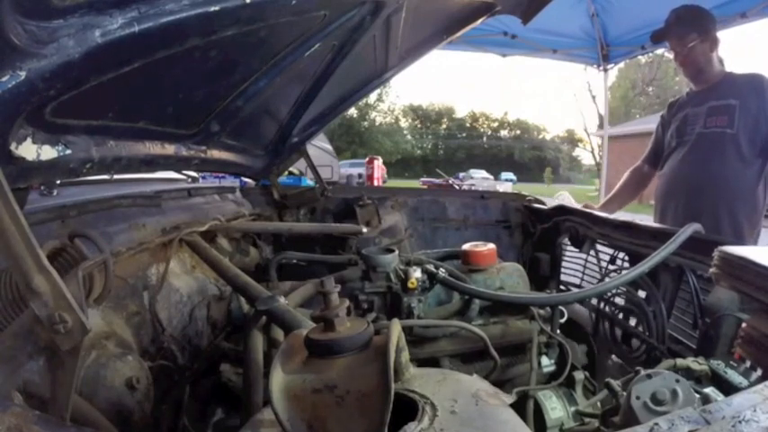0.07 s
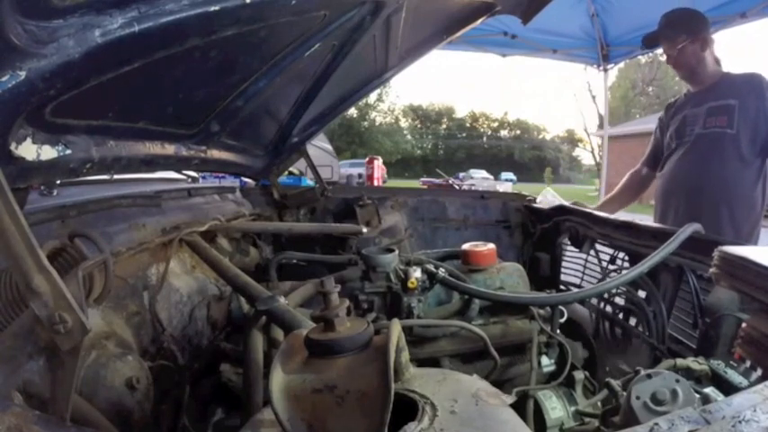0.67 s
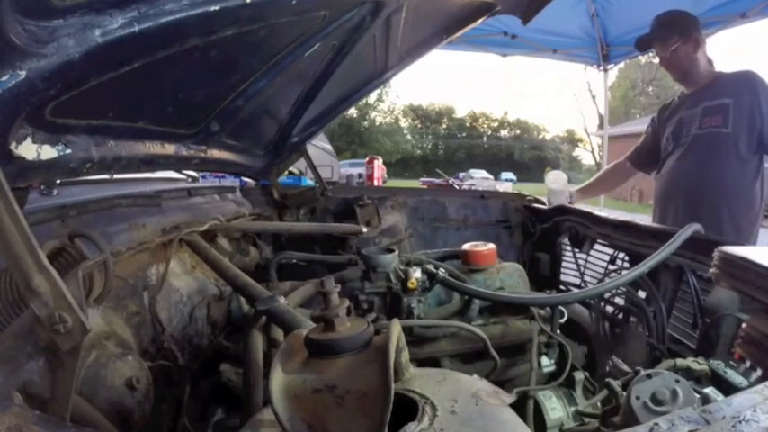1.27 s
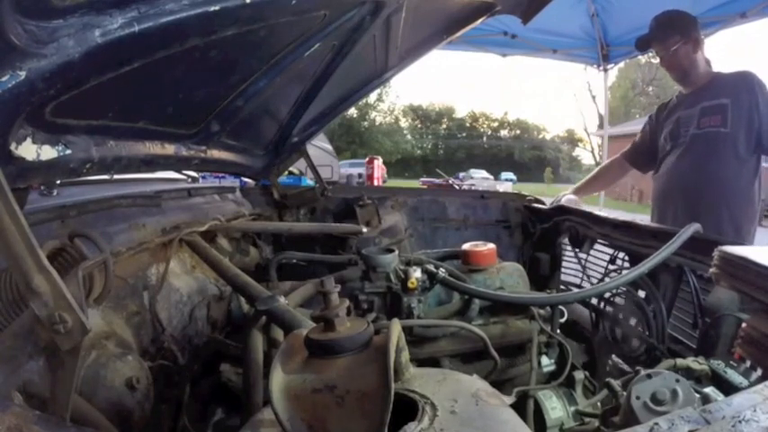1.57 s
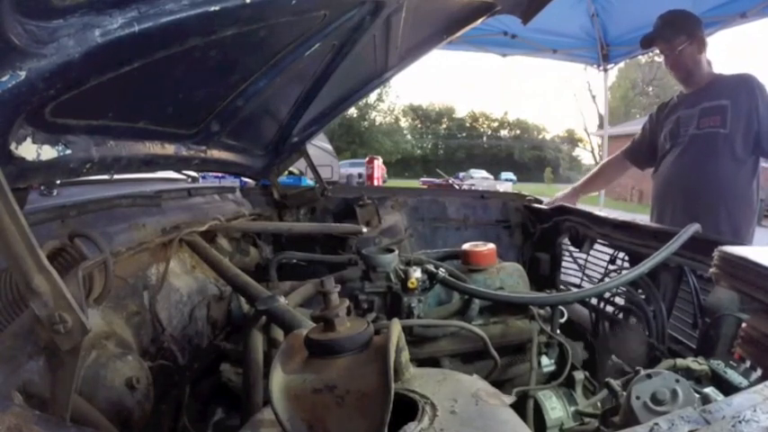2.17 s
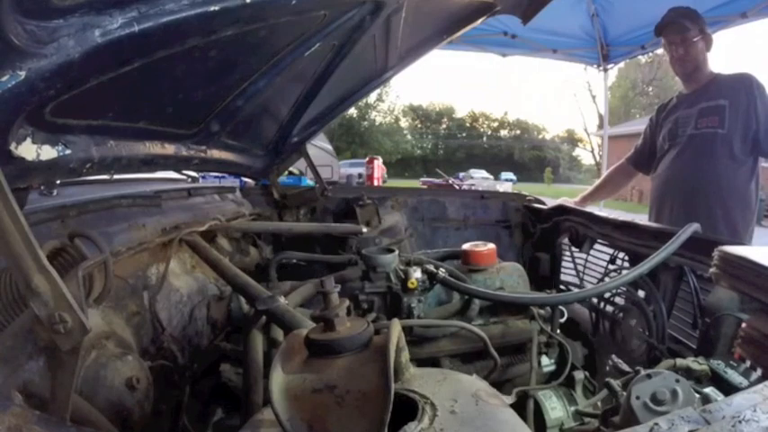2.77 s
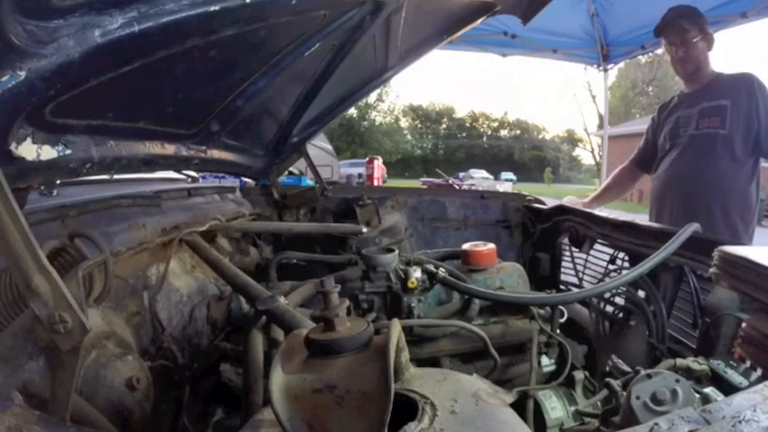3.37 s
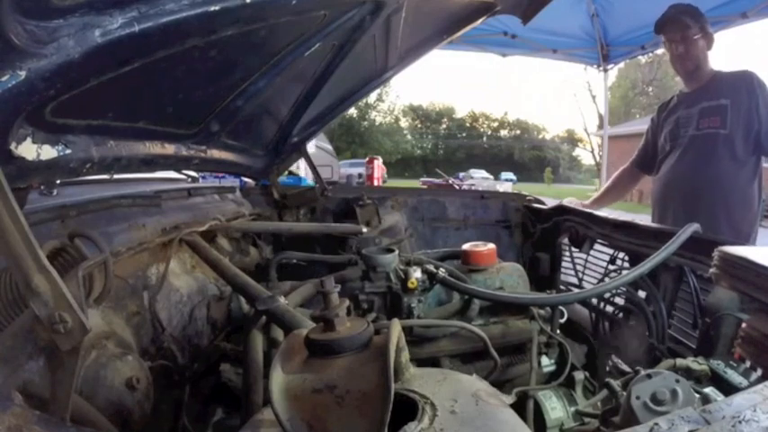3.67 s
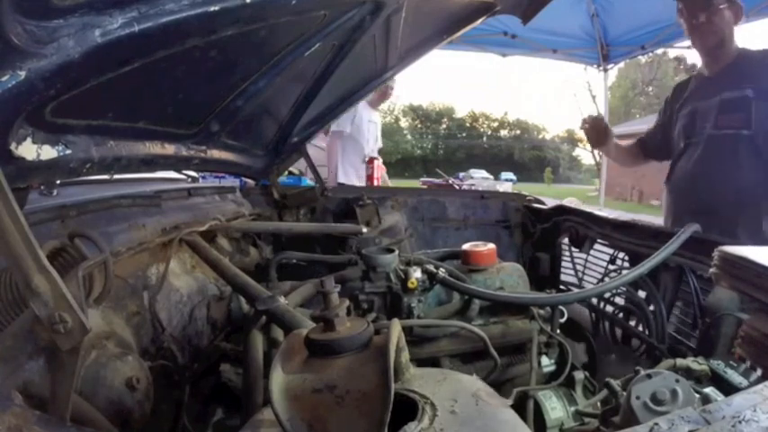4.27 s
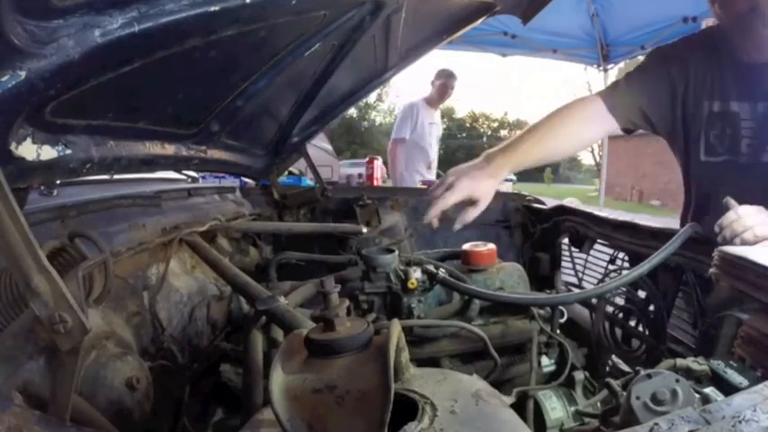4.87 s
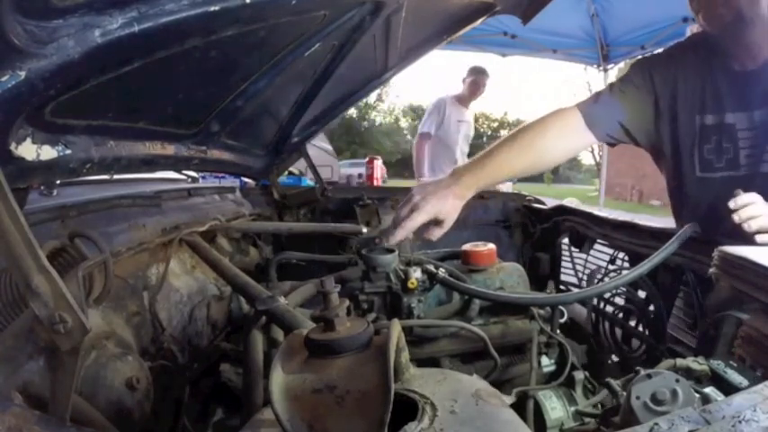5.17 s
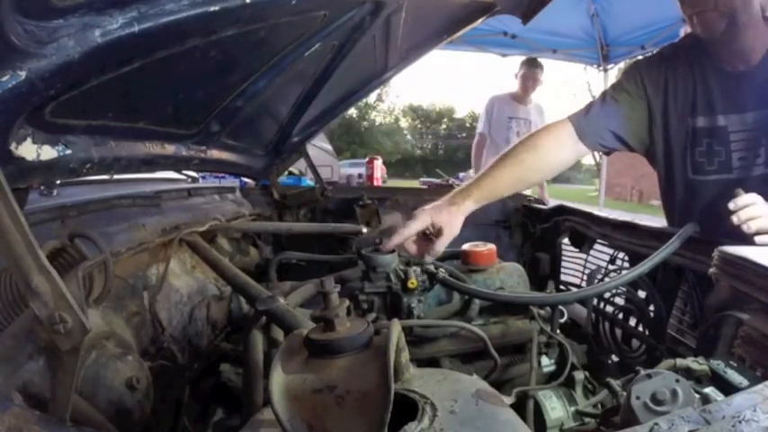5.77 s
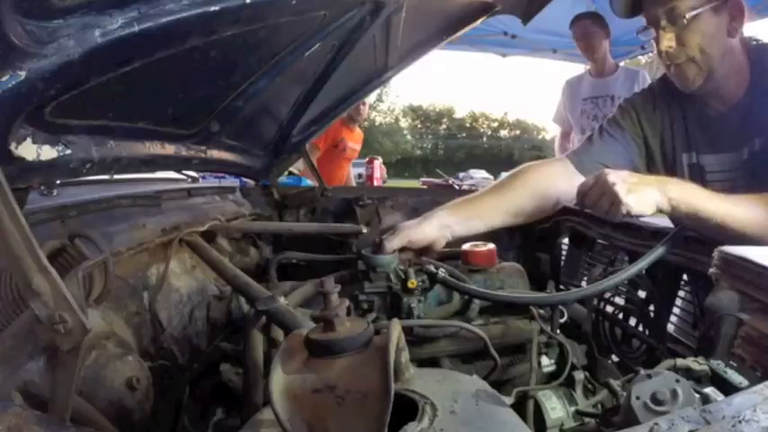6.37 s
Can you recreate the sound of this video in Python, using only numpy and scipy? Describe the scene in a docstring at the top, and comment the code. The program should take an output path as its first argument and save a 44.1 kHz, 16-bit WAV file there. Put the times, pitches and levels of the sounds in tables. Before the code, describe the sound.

With the microphone close in the engine bay, a worn engine chugs and rattles while its carburetor spits now and then. After about five seconds it starves and slows, leaving light ticks, a faint whine and some last chugs. It cuts off abruptly. A hard metallic knock follows with a short room echo, then a faint low rumble.

```python
"""An old engine runs unevenly on fuel poured into the carburetor, the microphone under its open hood.
Each firing chugs in the exhaust, worn parts clatter with every turn of the crank, the belt rubs and
the carburetor spits. Near 4.9 s the fuel runs out: the clatter stops and the engine falters, valves
ticking. The sound breaks off at 5.8 s; a hard knock on metal rings in a room, overloading the
recorder, and a faint rumble comes in at the end."""
import sys
import numpy as np
from scipy import signal
from scipy.fft import rfft, irfft
from scipy.io import wavfile
from scipy.ndimage import uniform_filter1d, map_coordinates

SR = 44100
rng = np.random.default_rng(int(sys.argv[2]) if len(sys.argv) > 2 else 0)


def materialize(psi):
    """Save the field psi as 16-bit PCM at rate SR to the path in sys.argv[1].

    A 1-D psi becomes a single channel; in a 2-D psi each row is a channel.
    """
    bounded = np.clip(np.atleast_2d(psi).T, -1, 1)
    quanta = np.round(bounded * 32767).astype(np.int16)
    wavfile.write(sys.argv[1], SR, quanta)


N = 287091
T = np.arange(N) / SR
HZ = np.fft.rfftfreq(16384, 1 / SR)
STARVED_S, SLOWING_S = 4.9, 5.137  # the fuel runs out; friction starts to brake the crank
BREAK_S, KNOCK_S = 5.812, 6.0285
VALVE_PLACE, VALVES_PER_TURN = .327, 3  # a "place" is a position in the crank's turn, 0-1

# crankshaft speed before braking, sagging slowly: t/s, speed/(turns/s)
CRANK_SPEED = [(0, 11.11), (.8, 10.95), (1.6, 10.91), (2.4, 10.84), (2.8, 10.76), (4, 10.64), (4.4, 10.63),
               (4.85, 10.5)]
# broad colour of the engine bay: f/Hz, relative level/dB
BAY_COLOUR = [(30, -23), (250, -6.5), (550, -15), (1000, -8), (1800, -10.5), (2400, -7.5), (4300, -14.5),
              (6200, -15.5), (7200, -25), (10500, -35.5), (12000, -41.5), (15000, -47.5)]
# resonances of block and panels: f/Hz, width/Hz, boost/dB, place that jars it/turns
BAY_MODES = [(1000, 99, 3.6, 0.518), (1122, 160, 3.8, .4), (1236, 24, 0.57, 0.497), (1332, 42, 3.4, .55),
             (1483, 175, 8.7, .47), (1678, 51, 2, .4), (1903, 115, 2.34, .2), (2203, 200, 9.6, .12),
             (2456, 110, 6.8, 0.44), (2705, 76, 1.8, .1), (2904, 190, 7.8, .08), (3157, 220, 7.3, .2),
             (3430, 71, 4.6, 0.42), (3613, 304, 10.4, .06), (4053, 203, 11.6, 0.55), (4269, 132, 12.1, .55),
             (4450, 160, 5.5, .4), (4663, 126, 8.9, .62), (5024, 310, 5, 0.6), (5130, 75, 4.3, 0.63),
             (5600, 160, 3.6, 0.34), (6074, 150, 7.7, 0.75), (6830, 230, 4.3, 0.041), (7480, 200, 4, 0.034),
             (9100, 310, 5, 0.036), (10750, 260, 4, .4)]


def amp(db):
    """Decibels to gain."""
    return 10 ** (np.asarray(db) / 20)


def unit(x):
    """Scales to rms 1."""
    return x / np.sqrt(np.mean(x ** 2) + 1e-20)


def curve(rows, column=1):
    """One column of a time table at every sample."""
    rows = np.array(rows)
    return np.interp(T, rows[:, 0], rows[:, column])


def spectrum(points, hz):
    """Interpolates a table on a log-frequency axis."""
    f, value = np.transpose(points)
    return np.interp(np.log(hz + 1), np.log(f + 1), value)


def bell(x, width):
    """A bell curve of height 1."""
    return np.exp(-.5 * (x / width) ** 2)


def ramp(start, end):
    """Rises from 0 to 1 between two times."""
    return np.clip((T - start) / max(end - start, 1e-4), 0, 1)


def surge(s, rise, decay):
    """Swells to 1 at time s and dies away."""
    return np.where(T < s, bell(T - s, rise), np.exp(-abs(T - s) / decay))


def body(points, modes=()):
    """Gain from a broad colour (f/Hz, level/dB) and its resonances (f/Hz, width/Hz, boost/dB)."""
    peaks_db = sum(db * np.exp(-(2 * (HZ - f) / width) ** 2) for f, width, db, *_ in modes)
    return amp(spectrum(points, HZ) + peaks_db)


def band(centre_hz, octaves):
    """Gain of a soft band around a centre."""
    return bell(np.log2((HZ + 1) / centre_hz), octaves)


def colour(x, gain):
    """Minimum-phase filter shaped like this gain; white noise keeps its power."""
    cepstrum = irfft(np.log(np.maximum(unit(gain), 1e-5)))
    cepstrum[1:len(gain) - 1] *= 2
    cepstrum[len(gain):] = 0
    impulse = irfft(np.exp(rfft(cepstrum)))[:len(gain)]
    return signal.oaconvolve(x, impulse)[:N]


def noise():
    """White noise of power 1."""
    return rng.standard_normal(N)


def wobble(rate_hz, octaves):
    """Random motion around a rate, rms about 1."""
    return colour(noise(), band(rate_hz, octaves))


def flicker(depth_db, samples):
    """A fast random gain of rms 1."""
    return unit(amp(depth_db * unit(uniform_filter1d(noise(), size=samples))))


def add(mix, s, sound):
    """Mixes a sound in at time s."""
    at = round(s * SR)
    sound = sound[max(-at, 0):]
    part = mix[max(at, 0):][:len(sound)]
    part += sound[:len(part)]


def crank(braking=6.284):
    """Turns of the crankshaft so far: nearly steady, then braked by friction (turns/s^2)."""
    speed = curve(CRANK_SPEED) - braking * np.maximum(T - SLOWING_S, 0)
    return np.cumsum(speed) / SR - .022


def passes(place, start, end, count=1):
    """Times at which the crank passes a place in its turn, or count evenly spaced places."""
    times = T[1:][np.diff(np.floor((crank() - place) * count)) > 0]
    return times[(times > start) & (times < end)]


def each_turn(place, rise, decay, uneven_db, play=0):
    """One swell per crank turn, each of its own strength; rise, decay and play are in turns."""
    turns = crank() - place + .3  # each cycle opens 0.3 turn ahead of its peak
    from_peak = (turns + play) % 1 - .3
    force = amp(uneven_db * rng.standard_normal(100))[np.floor(turns).astype(int) + 1]
    return force * bell(from_peak, np.where(from_peak < 0, rise, decay))


def through_bay(x, bay, hz, octaves):
    """Sounds one band of the engine bay, louder where the bay responds more."""
    gain = bay * band(hz, octaves)
    return colour(x, gain) * np.sqrt(2 * np.sum(gain ** 2) / np.sum(bay ** 2))


def backgrounds(hush_db=-59, rumble_db=-41, rumble_decay_s=.2):
    """Room tone around the knock, and a low rumble that starts at the end."""
    # spectra of the room tone and the rumble: f/Hz, relative level/dB
    hush_colour = [(18, -74.5), (30, -34), (161, 0.5), (350, -11.5), (428, -19), (473, -9.5), (510, -17.5),
                   (2730, -30), (4190, -29), (12000, -51), (15600, -79), (22000, -120)]
    rumble_colour = [(18, -30), (30, 10.5), (102, -5), (510, -24), (593, -20), (689, -42), (821, -16),
                     (1080, -28), (1390, -9), (1740, -25.5), (12000, -53), (15600, -77), (22000, -120)]
    hush = amp(hush_db) * colour(noise(), body(hush_colour)) * ramp(5.8, 5.815) * (1 - ramp(6.158, 6.19))
    rumble = amp(rumble_db) * colour(noise(), body(rumble_colour)) * ramp(6.456, 6.459)
    return hush + rumble * np.exp(-abs(T - 6.459) / rumble_decay_s)


def room_tail(level_db=-10.5, rise_s=.013):
    """The room answers the knock with a diffuse tail that lasts longest in the midrange."""
    # colour of the reverberation: f/Hz, relative level/dB
    room_colour = [(47, -92.5), (80, -53.5), (178, -25.5), (293, -14), (348, -18), (547, -9.5), (665, -14),
                   (862, -15), (2280, -29), (2540, -35.5), (3020, -40), (3220, -37), (14000, -74)]
    # its decay: f/Hz, t60/s
    room_t60 = [(150, 0.32), (500, 0.77), (1200, 0.68), (2500, 0.49), (6000, 0.25), (12000, .25)]
    hz, times, frames = signal.stft(colour(noise(), body(room_colour)), SR, nperseg=256)
    decay = amp(-60 * np.maximum(times - KNOCK_S, 0) / spectrum(room_t60, hz)[:, None])
    tail = signal.istft(frames * decay, SR, nperseg=256)[1][:N]
    return amp(level_db) * tail * (1 - np.exp(-np.maximum(T - KNOCK_S, 0) / rise_s))


def knock(crack_db=-6, crack_decay_s=.0094, rebound_db=-27, snap_db=-1, chatter_db=-27):
    """A hard blow on metal in a room: snap, crack, chatter, ring and a light rebound, faded quickly."""
    # ringing tones of the knock, plus a faint, steady high whistle at 6.2 kHz: f/Hz, level/dB, t60/s
    knock_tones = [(545, -5.5, 0.11), (292.6, -21.5, 0.38), (378, -19, 0.31), (470, -21, 0.33),
                   (510, -21, .4), (510, -21.5, .4), (539, -18, .6), (556, -17.5, 0.53), (630, -19, 0.4),
                   (795, -25, .62), (813, -25.5, .55), (837, -24.5, .55), (867, -22, 0.88),
                   (940, -20.5, 0.36), (1152, -21.5, .35), (1414, -24, 2.4), (1602, -9, 0.1),
                   (2080, -29.5, .5), (2240, -23.5, 0.28), (2660, -20, .08), (2910, -21.5, 0.25),
                   (3660, -39, 0.45), (4190, -54, 2.5), (6220, -69, 4.5)]
    t = np.maximum(T - KNOCK_S, 0)
    tones = sum((-1) ** k * amp(db - 60 * t / t60) * np.sin(2 * np.pi * f * t)
                for k, (f, db, t60) in enumerate(knock_tones))
    snap = amp(snap_db) * colour(noise() * (t > 0) * np.exp(-t / .00088), band(1800, .99))
    blow = amp(crack_db) * (t > 0) * np.exp(-t / crack_decay_s)
    rebound = amp(rebound_db) * bell(T - 6.061, .002)
    crack_gain = body([(60, -29), (150, -15), (320, -6.5), (900, .5), (1800, 3), (4000, -15),
                       (8000, -22.5), (15000, -35)])
    crack = colour(noise() * (blow + rebound), crack_gain)
    chatter = amp(chatter_db) * colour(noise() * (t > 0) * bell(t - .009, .0044), band(3500, .91))
    return (tones + snap + crack + chatter + room_tail()) * (1 - ramp(6.158, 6.19))


def gear(final_db=-50, growth_db_per_s=1.5, teeth=40, waver=.012):
    """A faint, wavering gear hum follows the crank and grows until the fuel runs out."""
    drift = np.cumsum(waver * curve(CRANK_SPEED) * wobble(13.5, .97)) / SR
    hum = np.sin(2 * np.pi * teeth * (crank() + drift))
    level = amp(final_db + growth_db_per_s * (T - STARVED_S))
    return level * hum * (1 - ramp(STARVED_S - .04, STARVED_S))


def faltering(whirr_db=-49, octave_db=-11):
    """With the clatter gone, a ringing whirr, a few scrapes and the belt drive's whine are left."""
    # colour of the whirr: f/Hz, relative level/dB
    whirr_colour = [(30, -33), (250, -15), (700, -15.5), (1400, -11.5), (2500, -17), (4200, -27.5),
                    (6500, -33), (9000, -40.5), (15000, -55)]
    # its resonances: f/Hz, width/Hz, boost/dB
    whirr_modes = [(340, 14, 3), (1420, 60, 7.6), (2230, 290, 13), (2950, 208, 9.3), (3620, 210, 9.1),
                   (4740, 320, 6), (6100, 510, 6.3)]
    # short hissing scrapes: t/s, level/dB, width/s
    scrape_events = [(4.876, -47, 0.015), (4.96, -49.5, .025), (5.05, -47.5, 0.017)]
    # the unevenly falling whine: t/s, f/Hz, level/dB
    whine_path = [(5.25, 550, -63), (5.38, 520, -48), (5.47, 485, -41), (5.55, 530, -46), (5.66, 515, -42),
                  (5.78, 475, -45), (5.83, 460, -42)]
    treble_tilt = body([(2400, -4.5), (3400, -4), (9000, -1)])
    whirr_gain = body(whirr_colour, whirr_modes) * treble_tilt
    whirr = colour(noise() * amp(whirr_db) * ramp(4.8, 4.9), whirr_gain)
    scraping = sum(amp(db) * bell(T - s, width) for s, db, width in scrape_events)
    scrapes = colour(noise() * scraping, band(5100, .13) + .28 * band(5300, .7))
    angle = 2 * np.pi * np.cumsum(curve(whine_path) * (1 + .018 * wobble(14.6, 1))) / SR
    whine = amp(curve(whine_path, column=2)) * (np.sin(angle) + amp(octave_db) * np.sin(2 * angle))
    return whirr + scrapes + whine * ramp(5.2, 5.21) * abs(wobble(8.95, .53))


def valves(tick_db=-48, ring_db=1.5, ring_rise_s=.0042, uneven_db=.5):
    """Each valve of the coasting engine snaps open with a short tick and rings the valve gear."""
    # valve gear modes, the latest sounding as the valve seats: f/Hz, relative level/dB, t60/s, delay/s
    valve_modes = [(2320, -37.5, 0.06, 0.0066), (2266, -40, 0.089, 0.0012), (2930, -42.5, 0.045, 0),
                   (2990, -45, .045, 0), (3540, -41, 0.036, 0), (3610, -51, .05, 0)]
    times = passes(VALVE_PLACE, SLOWING_S, BREAK_S, count=VALVES_PER_TURN) - .0005
    tick_gain = body([(600, -25), (1800, -5), (2400, 5), (4200, -7), (7300, -10.5), (8300, -23),
                      (15000, -31)], modes=[(4730, 300, 5), (6100, 400, 4.3)])
    ticks = sum(surge(s, rise=.004, decay=.0076) for s in times)
    out = colour(noise() * amp(tick_db) * ticks, tick_gain)
    t = np.arange(SR // 10) / SR
    for hz, db, t60, delay in valve_modes:
        envelope = amp(db + ring_db - 60 * t / t60) * (1 - np.exp(-t / ring_rise_s))
        for s, (force, detune) in zip(times, rng.standard_normal((len(times), 2))):
            ring = np.sin(2 * np.pi * hz * (1 + .0039 * detune) * t)
            add(out, s + delay, amp(uneven_db * force) * envelope * ring)
    return out


def squeaks(fall_per_s=.94, waver=.0089):
    """The slipping belt gives brief, slightly falling squeaks."""
    # slips of the belt: t/s, f/Hz, level/dB, width/s
    slips = [(2.584, 1050, -33, 0.013), (2.603, 796, -34, 0.022), (5.466, 1470, -46, 0.03),
             (5.776, 2830, -45, 0.016), (5.779, 950, -36.5, 0.018)]
    out = np.zeros(N)
    for s, hz, db, width in slips:
        pitch = hz * (1 - fall_per_s * (T - s) + waver * wobble(40, 1))
        out += amp(db) * bell(T - s, width) * np.sin(2 * np.pi * np.cumsum(pitch) / SR)
    return out


def carburetor(intake_db=3, rasp_db=-4, ring_db=-5, ring_lag_s=.0035):
    """Air gulps through the throat; charges spit back with a fluttering rasp and leave it ringing."""
    # gulps of air: t/s, relative level/dB, decay/s
    gulps = [(4.87, -35.5, 0.032), (5.1, -43, 0.084), (5.535, -36.5, 0.15)]
    # spits: t/s, level/dB, rise/s, decay/s, throat f/Hz
    spits = [(0.638, -19, 0.014, 0.034, 1413), (1.396, -22, 0.017, 0.035, 1390),
             (2.131, -21, 0.017, 0.034, 1353), (2.615, -33.5, 0.034, 0.081, 890),
             (3.725, -32.5, 0.011, 0.01, 1160), (4.7805, -11.5, 0.0018, 0.0083, 1330),
             (4.8, -27.5, 0.042, 0.041, 1362), (4.849, -26, 0.0027, 0.017, 2210),
             (5.039, -37, .003, 0.037, 1375), (5.148, -31.5, 0.0031, .02, 1360),
             (5.164, -33.5, 0.0092, 0.019, 1170), (5.484, -37.5, .001, 0.028, 1496),
             (5.565, -37, 0.0073, .016, 1627)]
    throat = body([(100, -49), (450, -19), (700, -8.5), (1100, -4.5), (1500, -.5), (1900, -9.5),
                   (3000, -24), (6000, -42), (14000, -64.5)], modes=[(1490, 100, 9.8)])
    intake = sum(amp(db + intake_db) * surge(s, rise=.047, decay=decay) for s, db, decay in gulps)
    out = colour(noise() * intake * ramp(4.82, 4.83), throat)
    flutter = flicker(depth_db=3, samples=120)
    for s, db, rise, decay, hz in spits:
        pitch = hz * (1 + .015 * wobble(58, .8))
        ring = np.sin(2 * np.pi * np.cumsum(pitch) / SR)
        out += amp(db + ring_db) * surge(s + ring_lag_s, rise, decay) * ring
        rasp = amp(rasp_db) * min(rise / .02, 1)  # a drawn-out spit sounds the upper resonance more
        spit_gain = band(hz, .12) + (.21 + .86 * rasp) * band(hz, .74) + rasp * band(hz * 1.724, .16)
        out += colour(noise() * flutter * amp(db) * surge(s, rise, decay), spit_gain)
    return out


def belt(bay, grit, turns_per_lap=3, uneven_db=1):
    """Each worn patch of the fan belt rubs with a hiss as it comes round."""
    # worn patches: place in the lap/turns, width/turns, relative level/dB, f/Hz, spread/octaves
    patches = [(.67, 0.062, -4, 4800, 0.37), (1.13, 0.079, -1.5, 4000, 0.21), (1.55, 0.099, -7.5, 5200, .4),
               (1.87, .09, -5.5, 4990, 0.58), (2.52, 0.097, -2.5, 4750, .65), (2.79, .11, -2, 5500, .75)]
    out, turns = np.zeros(N), crank()
    for place, width, db, hz, octaves in patches:
        lap = (turns - place) / turns_per_lap
        force = amp(db + uneven_db * rng.standard_normal(100))[np.round(lap).astype(int) + 1]
        rub = bell((lap - np.round(lap)) * turns_per_lap, width)
        out += through_bay(grit * noise() * force * rub, bay, hz, octaves)
    return out


def jingle(bounces_per_s=1600):
    """Thin steel parts bounce in a flurry once in every turn, each ringing at its own high pitch."""
    # steel parts: f/Hz, level against the clatter/dB, t60/s, place/turns
    steel_parts = [(7750, -28, 0.015, 0), (8920, -38.5, .012, 0.08), (9560, -43.5, .012, 0.05),
                   (10750, -44, .012, .38), (10600, -49, .012, 0.3), (12140, -49, .012, .4),
                   (12800, -45.5, .014, .04), (14200, -52, .008, .45)]
    out, t = np.zeros(N), np.arange(SR // 10) / SR
    for hz, db, t60, place in steel_parts:
        flurry = each_turn(place, rise=.036, decay=.26, uneven_db=1.2)
        bounces = noise() * (rng.random(N) < bounces_per_s / SR) * flurry
        ring = t * amp(-60 * t / t60) * np.sin(2 * np.pi * hz * t)
        out += amp(db) * unit(signal.oaconvolve(bounces, ring)[:N])
    return out


def panels(t60_s=.25, rise_s=.0053, uneven_db=4.5, scatter_turns=.07, detuning=.1156, sag_per_s=.059):
    """Each bay resonance is jarred once a turn, hard or softly, and rings as a sagging close pair."""
    out, t, turns = np.zeros(N), np.arange(SR // 6) / SR, crank()
    sag = 1 - sag_per_s * (t / 2 - 2 * rise_s)
    for hz, width, db, place in BAY_MODES:
        draws = rng.standard_normal((int(turns[-1]), 4))
        times = np.interp(np.arange(len(draws)) + place + scatter_turns * draws[:, 0], turns, T)
        envelope = amp(spectrum(BAY_COLOUR, hz) + db - 60 * t / t60_s) * (1 - np.exp(-t / rise_s))
        for s, (_, force, *pair) in zip(times, draws):
            ring = sum(np.sin(2 * np.pi * (hz + detuning * width * offset) * t * sag) for offset in pair)
            add(out, s, amp(uneven_db * np.clip(force, -2, 1.3)) * envelope * ring)
    return unit(out)


def wander(x, depth=.00808, rate_hz=9):
    """Loose parts shift in their seats, so the pitch of their ringing wanders."""
    drift = np.cumsum(depth * wobble(rate_hz, .5))
    return map_coordinates(x, [np.arange(N) + drift], order=5)


def fan_echo(x, share=.18, delay_s=.0028, sweep_s=.000927):
    """The fan reflects clatter to the microphone on a lengthening path: its colour falls each turn."""
    place = crank() % 1
    echo = map_coordinates(x, [(T - delay_s - sweep_s * place) * SR], order=3)
    return x + share * np.sin(np.pi * place) * echo


def clatter(level_db=2.5, grind_db=-7, panels_db=-6):
    """Worn parts make strokes of tiny impacts in every turn and ring the bay around the microphone."""
    # rubbing, rattling strokes: place/turns, rise/turns, decay/turns, level/dB, f/Hz, spread/octaves
    strokes = [(.02, 0.029, 0.25, -0.5, 10150, 0.81), (.1, 0.056, 0.19, -5, 2610, 0.63),
               (.39, 0.025, 0.16, -3, 9230, 1.08), (.5, 0.13, 0.19, -8, 1380, 1),
               (.62, .13, 0.096, -10, 4970, 0.45), (.84, 0.096, .09, -13, 9030, 0.64)]
    # strength of the clatter, steady until it stops: t/s, relative level/dB
    strength = [(0, -29.5), (4.3, -30.5), (4.835, -30.5), (4.865, -44), (4.9, -57), (4.97, -45.5),
                (5.02, -62)]
    bay = body(BAY_COLOUR, BAY_MODES)
    grit = flicker(depth_db=2, samples=50)
    rubbing = amp(grind_db) * colour(grit * noise(), bay) + belt(bay, grit)
    for place, rise, decay, db, hz, octaves in strokes:
        play = .023 * wobble(8.4, .98)  # loose parts land a little early or late
        stroke = amp(db) * each_turn(place, rise, decay, uneven_db=1.94, play=play)
        rubbing += through_bay(grit * noise() * stroke, bay, hz, octaves)
    rattle = fan_echo(wander(unit(rubbing) + amp(panels_db) * panels()))
    return amp(curve(strength) + level_db) * (unit(rattle) + jingle()) * (1 - ramp(4.77, 6.5))


def chugs(weak_place=.2486, puff_lag_s=.008, clearance_s=.03):
    """The firings, weak chugs of cylinders that barely catch, and unfired puffs while coasting."""
    # firings, about one a turn while the fuel lasts, then a few stragglers: t/s, boom/dB, bark/dB
    firings = [(0.064, -8.0, -19), (0.138, -10, -24), (0.243, -10, -25), (0.319, -9, -22.5),
               (0.423, -9, -28), (0.499, -9, -24.0), (0.589, -10.5, -24.5), (0.679, -7, -20.5),
               (0.791, -7.5, -29), (0.865, -10, -23), (0.968, -12, -24), (1.062, -9.5, -27.5),
               (1.157, -6.5, -20.5), (1.232, -9.0, -21.5), (1.338, -10.5, -32.0), (1.414, -7, -18.0),
               (1.503, -10.0, -22), (1.61, -12.5, -23.5), (1.688, -5, -19), (1.781, -6.5, -24),
               (1.888, -9.0, -31), (1.965, -9.5, -23), (2.07, -8, -23.5), (2.163, -8.0, -21),
               (2.256, -9.5, -30), (2.348, -9, -37), (2.441, -6.5, -21), (2.519, -7.5, -18.5),
               (2.623, -10, -21), (2.717, -8.5, -28.5), (2.81, -7.5, -21.5), (2.904, -7.5, -26),
               (2.997, -9.5, -32.5), (3.089, -7.5, -27), (3.182, -10.5, -34.5), (3.277, -10.5, -31.5),
               (3.37, -8.5, -25.5), (3.463, -8, -34), (3.56, -7.5, -23), (3.638, -9.0, -23.5),
               (3.777, -8.5, -29.5), (3.838, -7.5, -23), (3.933, -9.5, -27.5), (4.027, -9.5, -34.5),
               (4.122, -6.5, -24.0), (4.2, -9.0, -18.5), (4.308, -14.5, -34.0), (4.418, -8.5, -31.5),
               (4.497, -7.5, -25.5), (4.591, -10.5, -29.5), (4.687, -10, -33.5), (4.781, -7, -14.5),
               (4.872, -13, -23.5), (4.998, -13.5, -40), (5.526, -7.5, -17), (5.585, -8.5, -22),
               (5.699, -13.5, -28), (5.784, -20, -38.5)]
    weak = [(s, -16.5, -36) for s in passes(weak_place, 0, STARVED_S)]
    openings = passes(VALVE_PLACE, STARVED_S, BREAK_S, count=VALVES_PER_TURN)
    puffs = [(s + puff_lag_s, -21, -52) for s in openings]
    soft = np.array(weak + puffs)
    clear_of_firings = abs(soft[:, :1] - np.array(firings)[:, 0]).min(axis=1) > clearance_s
    soft += rng.standard_normal(soft.shape) * [.0024, .5, 5.5]  # scatter: t/s, boom/dB, bark/dB
    return np.vstack([firings, soft[clear_of_firings]])


def gas_flow(pulses, burble_db=-39, firing_db=-34, hum_db=-38):
    """Under the chugs, turbulence burbles with the flow and a firing tone gives way to a low hum."""
    flow = unit(abs(signal.hilbert(pulses)))
    burble_gain = body([(15, -20.5), (32, -16), (60, -17), (80, 6.5), (100, 5), (135, -12), (172, -1),
                        (260, -20), (380, -22.5), (520, -29.5), (1200, -76)])
    burble = colour(noise(), burble_gain) * (1.19 + flow)
    angle = 2 * np.pi * crank()  # six cylinders fire three times a turn
    firing = (np.sin(3 * angle) + amp(-9) * np.sin(2 * angle)) * (1 - ramp(4.85, 5))
    hum = colour(noise() * (T > STARVED_S - .1), band(59.33, .12))  # unfired cylinders still pump air
    return amp(burble_db) * burble + amp(firing_db) * firing + amp(hum_db) * hum


def exhaust(swell_s=.038, boom_hz=56.6, boom_db=1, thump_hz=175, thump_s=.0051, bark_lead_s=.0083):
    """Each chug swells in the muffler's deep resonance; its sharp front thumps and barks in the pipe."""
    # overtones of the exhaust pipe: f/Hz, t60/s, relative level/dB
    pipe_modes = [(70.5, 0.12, 8.5), (104.4, 0.12, 4.5), (115, 0.053, -3), (170.2, 0.13, 0.5),
                  (207.5, 0.079, -4.5), (298, 0.027, -5.5), (379, 0.091, -16)]
    out, t = np.zeros(N), np.arange(SR // 4) / SR
    swell = (t / swell_s * np.exp(1 - t / swell_s)) ** 4
    thump = -bell(t - swell_s, thump_s) * np.sin(2 * np.pi * thump_hz * (t - swell_s))
    bark_attack = (1 - np.exp(-t / .0019)) ** 2
    for s, chug_db, bark_db in chugs():
        detunes = rng.standard_normal(len(pipe_modes))
        boom = swell * np.cos(2 * np.pi * boom_hz * (1 + .037 * detunes[0]) * (t - swell_s))
        bark = sum(amp(db - 60 * t / t60) * np.sin(2 * np.pi * f * (1 + .055 * detune) * t)
                   for (f, t60, db), detune in zip(pipe_modes, detunes))
        add(out, s - swell_s, amp(chug_db + boom_db) * boom)
        add(out, s - swell_s + .0031, amp(bark_db) * thump)
        add(out, s - bark_lead_s, amp(bark_db) * bark * bark_attack)
    return out + gas_flow(out)


def scene():
    """In mono: the engine from under the hood until it breaks off, then the knock in a room."""
    engine = exhaust() + clatter() + gear() + carburetor() + faltering() + valves() + squeaks()
    engine *= 1 - ramp(BREAK_S - .006, BREAK_S + .0056)
    return (engine + knock() + backgrounds())[None]


def record(dry):
    """The knock overloads the recorder, which clips softly and passes 6 Hz to 15.6 kHz."""
    clipped = dry / (1 + dry ** 8) ** (1 / 8)
    low_cut = signal.butter(1, 6, "highpass", fs=SR, output="sos")
    high_cut = signal.firwin(255, 15600, window=("kaiser", 9), fs=SR)
    return signal.oaconvolve(signal.sosfilt(low_cut, clipped), high_cut[None], "same")


dry = scene()
out = record(dry)
materialize(out)
```